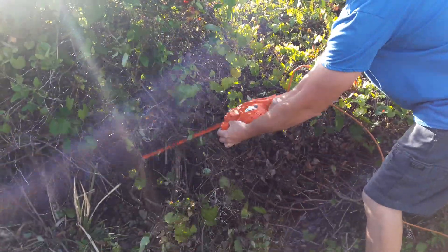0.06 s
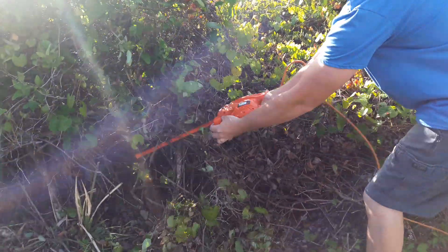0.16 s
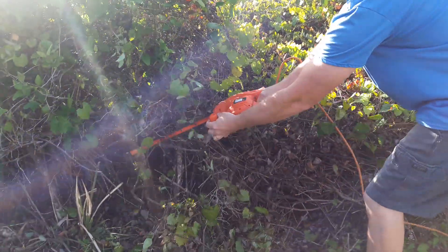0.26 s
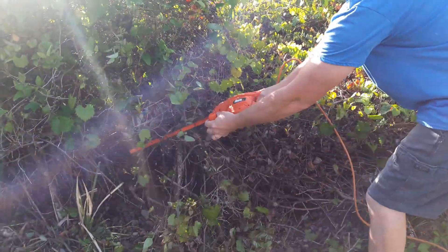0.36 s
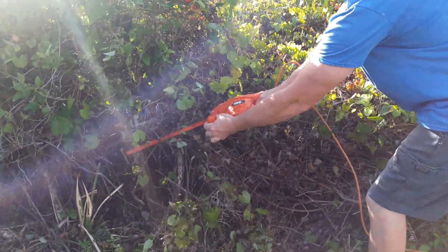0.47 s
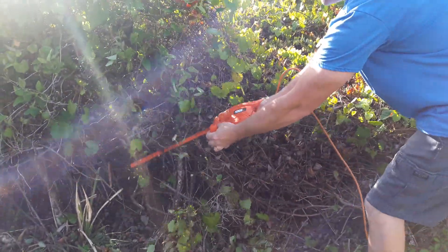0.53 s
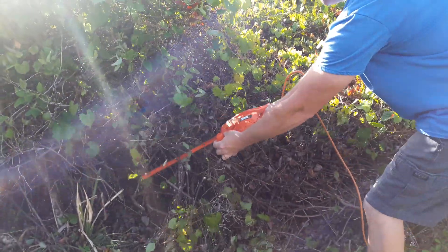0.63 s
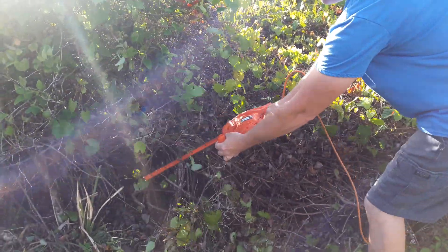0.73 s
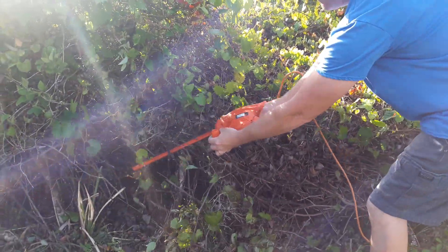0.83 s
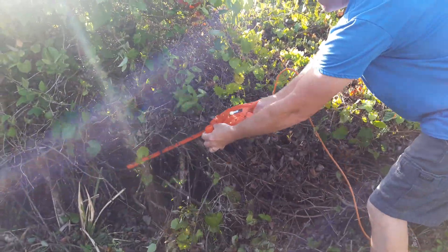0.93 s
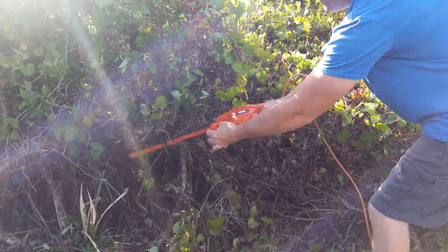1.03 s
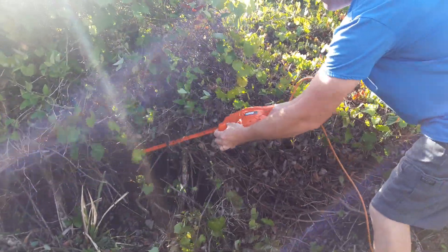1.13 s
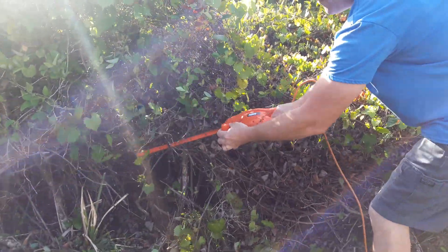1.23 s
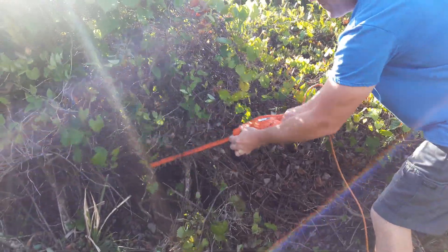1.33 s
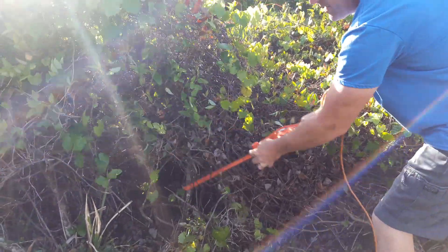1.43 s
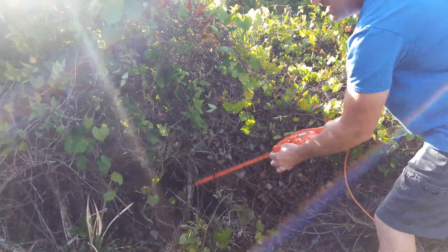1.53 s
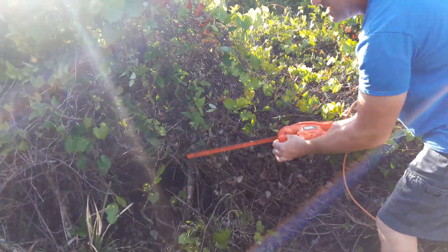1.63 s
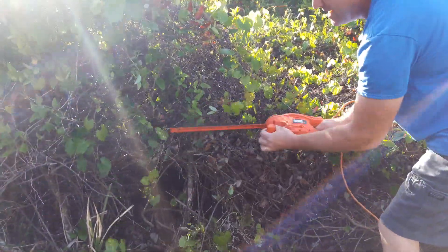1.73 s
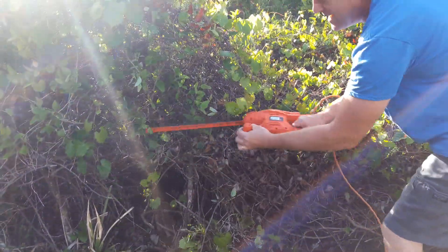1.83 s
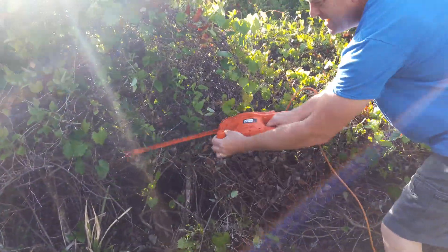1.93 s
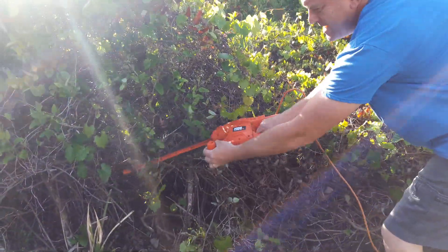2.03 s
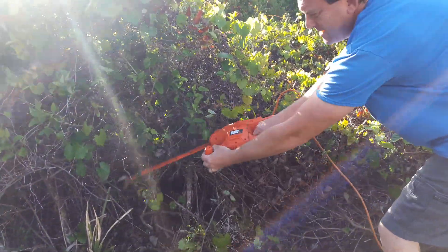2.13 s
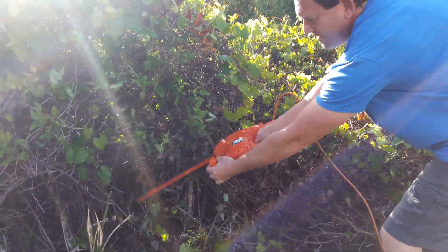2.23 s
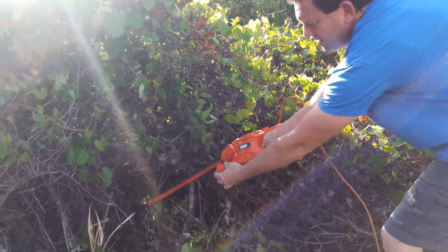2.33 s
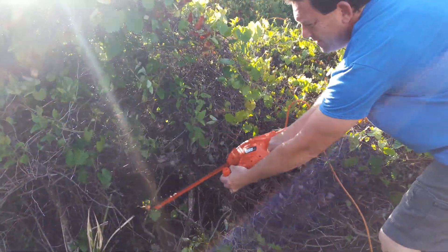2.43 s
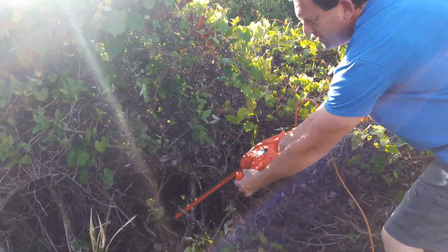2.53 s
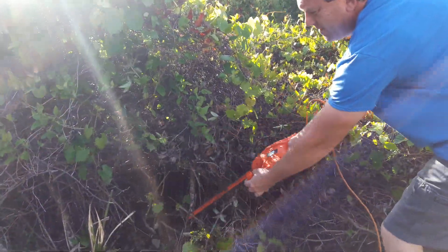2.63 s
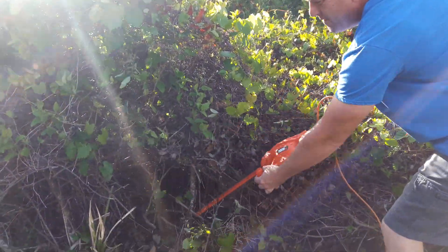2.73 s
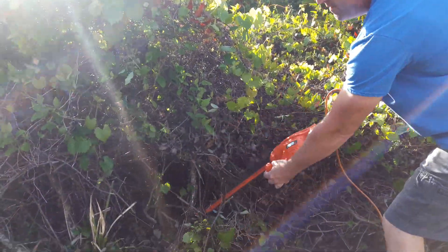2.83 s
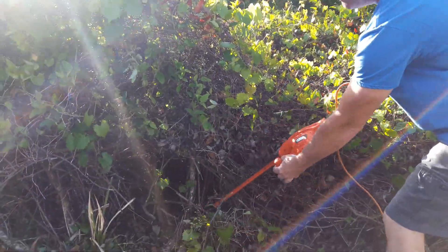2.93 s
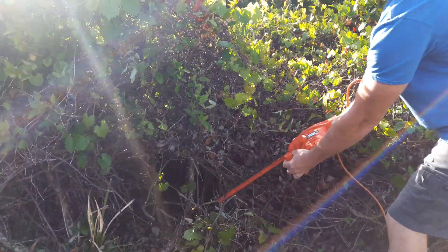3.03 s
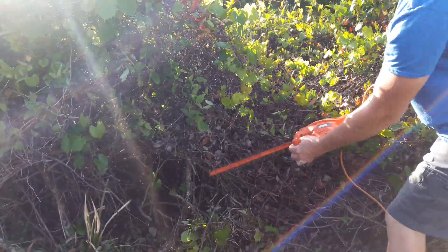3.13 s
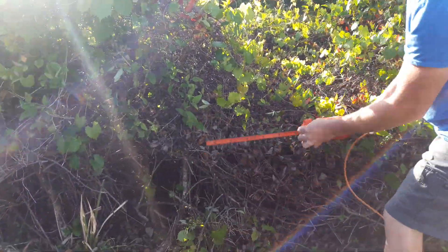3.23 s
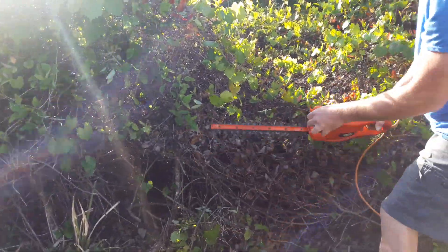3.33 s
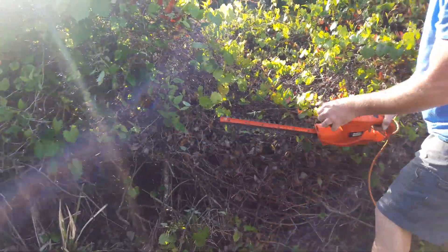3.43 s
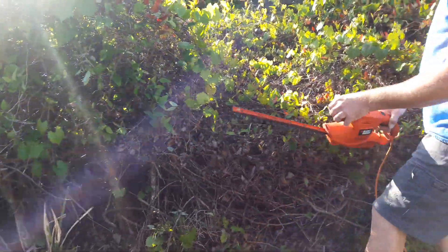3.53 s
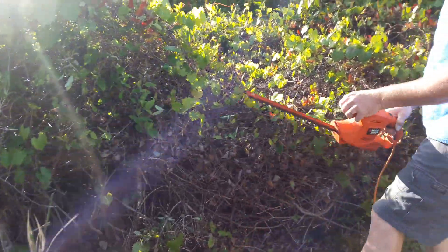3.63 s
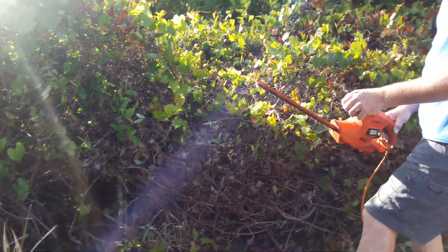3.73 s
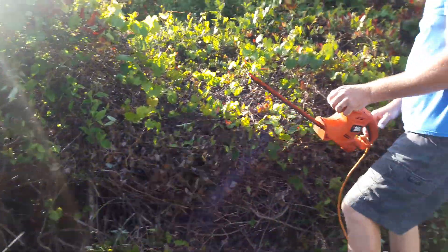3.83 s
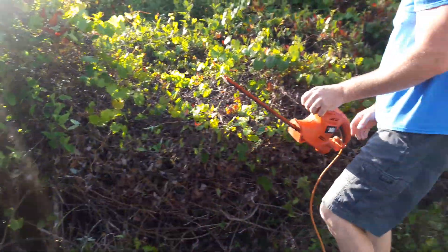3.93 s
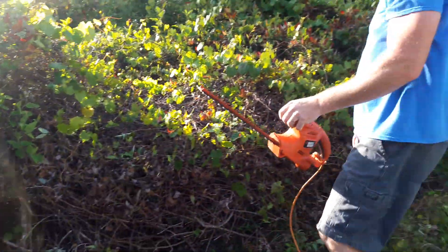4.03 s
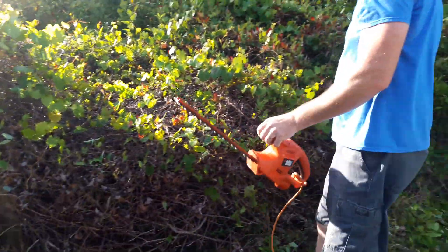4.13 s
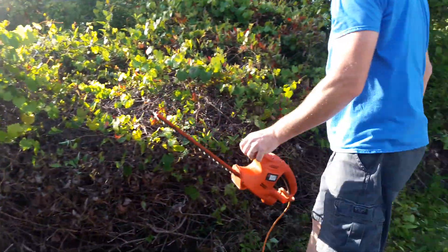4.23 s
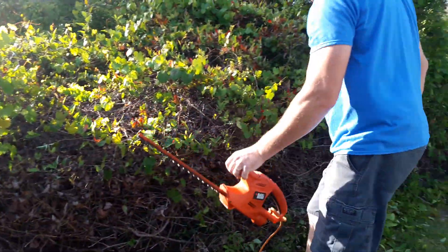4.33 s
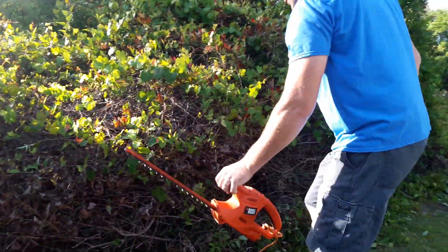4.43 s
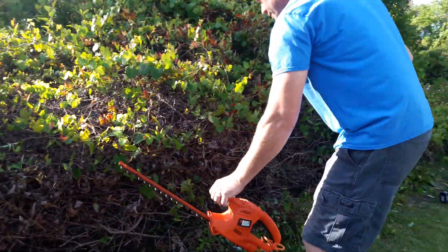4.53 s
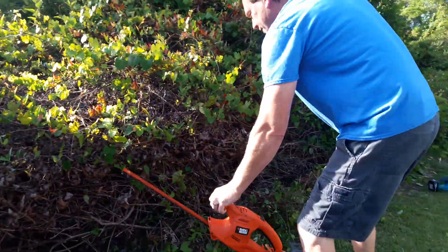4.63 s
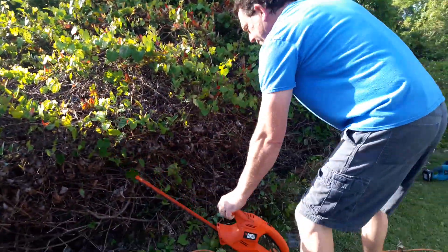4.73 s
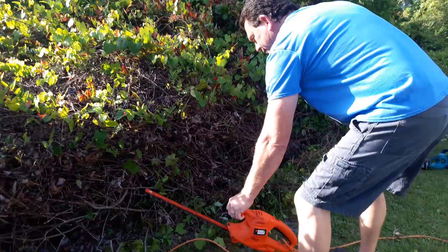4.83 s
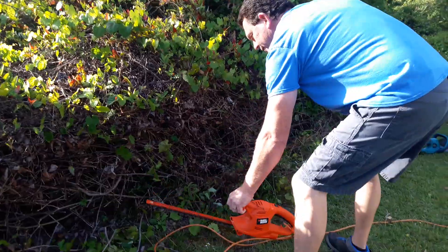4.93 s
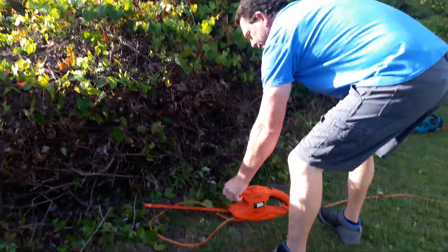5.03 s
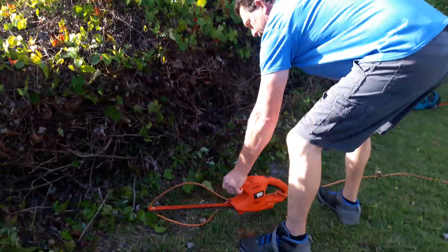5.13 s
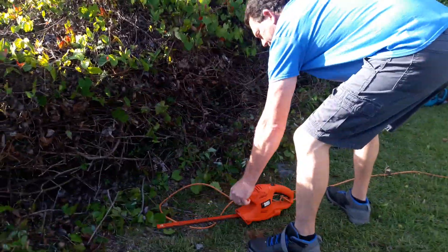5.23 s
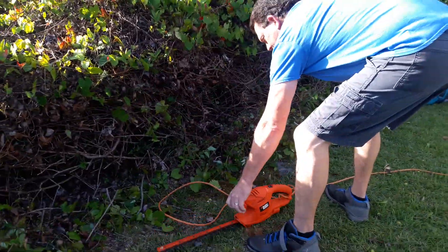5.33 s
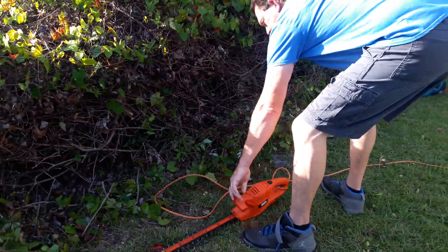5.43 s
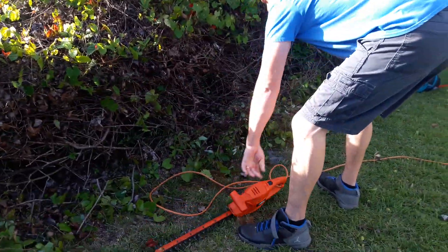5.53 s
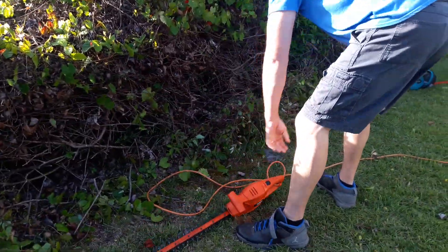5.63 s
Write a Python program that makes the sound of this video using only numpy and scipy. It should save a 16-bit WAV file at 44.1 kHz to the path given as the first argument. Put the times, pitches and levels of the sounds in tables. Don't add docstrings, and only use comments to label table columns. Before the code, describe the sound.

Harsh motor whirr and rapid blade chatter cut twigs outdoors, then the pitch slides down with loose knocks into quiet, windy garden air.

```python
import sys
import numpy as np
from scipy import signal
from scipy.fft import rfft, irfft, next_fast_len
from scipy.io import wavfile
from scipy.ndimage import uniform_filter1d, map_coordinates

SR = 44100
rng = np.random.default_rng(int(sys.argv[2]) if len(sys.argv) > 2 else 0)


def store_pcm(level_fs):
    pcm = np.round(np.clip(level_fs, -1, 1) * 32767).astype(np.int16)
    wavfile.write(sys.argv[1], SR, np.atleast_2d(pcm).T)


def how_loud(loudness_db):
    steps = np.asarray(loudness_db, float) / 20
    return 10 ** steps


N = 250482
T = np.arange(N) / SR

OFF_S, STOP_S = 3.2, 5.3742
RUB_HZ_PER_S, DRAG_HZ, DRAG_S = 531.9, 72.18, .7678
FULL_HZ = 2400
PINION, GEAR, FIRST_END = 6, 79, .27
TOOTH_DB, COAST_DB, COAST_DB_PER_HALVING = -38, -40, 4
BLADE_HZ = 2480
NIP_DB, NIP_SPREAD_DB, NIP_SNAP_DB = 4.5, 2, -11.5
KNOCK_SNAP_DB, TICK_SNAP_DB = -19, -24
GARDEN_DB, RUSTLE_DB, CALM_DB, HISS_DB = -56, -64.5, -64, -76

# time in seconds, tooth mesh in Hz, whine in dB.
MOTOR_LOAD = [(0, 2330, -46), (.3, 2262, -38), (.47, 2200, -36), (.7, 2375, -35), (.85, 2435, -57),
              (1.4, 2482, -42), (1.55, 2490, -48), (1.68, 2440, -41), (2.13, 2480, -41), (2.3, 2390, -38),
              (2.43, 2337, -30), (2.6, 2400, -37), (2.78, 2415, -38), (2.9, 2215, -31), (3.05, 2265, -35),
              (3.2, 2312, -35)]
# time in seconds, loudness in dB, turn toward the ports in dB, brush in dB.
SWEEP = [(0, -19.5, -1, 0), (.25, -21, 0.5, 2.5), (.45, -21.5, 0, 0.5), (.8, -22, 0, -1),
         (1.05, -21, 1.5, -1), (1.33, -20.5, 3, -2), (1.47, -22.5, -1.5, -1), (1.65, -21.5, 0, 1),
         (1.9, -21.5, -0.5, -0.5), (2.15, -20.5, .5, 1), (2.42, -20.5, 0, 1), (2.6, -22, 2, -1),
         (2.85, -21, -1, 0.5), (3.2, -23.5, 1, 1), (3.35, -29.5, -0.5, 0.5), (3.65, -26, 1.5, -1.5),
         (4.6, -38, -1.5, -2.5), (5.3, -48, -0.5, -1.5)]
PART_HZ = [900, 2400, 5000, 11000]
# level in dB in the brush, lifted and lowered, dB a halving of speed,
# share of the turn, share of the clack.
PARTS = [
    (-7.5, -8.5, -9, .5, -.3, 0.67),
    (-6.5, -8, -15, 1.1, .6, 1.36),
    (-3, -1.5, -3.5, -0.66, .8, 0.54),
    (-8.5, -8.5, -6.5, -3, -.3, .7),
]
BRUSH_SHARE = [-0.33, -.2, 0.0082, 1]
# frequency in Hz, density in dB per Hz.
VALLEY_TONE = [(100, -32), (300, -8.5), (1000, -12), (1800, 4), (2800, -6.5), (5000, -1.5), (7400, 1.5),
               (8200, -4), (12000, 1.5), (15800, -5)]
# frequency in Hz, width in Hz, level in dB.
MODES_IN_BRUSH = [(558, 238, -8.5), (1181, 580, -3), (2300, 390, 1), (2522, 214, 3), (3313, 650, -4),
                  (4577, 380, -3), (5610, 1100, -8.5), (6760, 950, -4.5), (9050, 620, -7),
                  (11220, 1400, -8.5)]
# frequency in Hz, width in Hz, level in dB.
MODES_RAISED = [(408, 430, -10.5), (1090, 280, -1.5), (2237, 330, 4.5), (2480, 210, 10.5), (3330, 1030, -3),
                (4640, 120, -1.5), (6000, 170, 1), (6720, 590, 0.5), (8700, 1100, -9.5), (12000, 1200, -19)]
# frequency in Hz, width in Hz, level in dB.
MODES_LOWERED = [(500, 240, -6), (1250, 360, 1), (2670, 700, 2), (4130, 480, -1), (4830, 400, -6),
                 (6124, 1300, -16), (10800, 2000, -17)]
# multiple of the mesh frequency, level in dB.
MESH_LINES = [(1, -3), (2, 5), (3, -5), (4, -4), (5, -2), (6, -4), (7, -2), (8, -6), (9, 0), (10, -4),
              (11, -9), (12, -5), (13, -6), (14, -10), (16, -9)]
# frequency in Hz, gain in dB.
MESH_RADIATION = [(300, -14), (750, -5), (1250, 2), (1700, -8), (2200, 1), (2900, -1), (3400, 2),
                  (3700, -5), (4200, 5), (4900, 0), (5800, 8), (6300, 2), (7000, 11), (8200, -7)]
# multiple of the shaft rate, level in dB.
SHAFT_LINES = [(1, -47.5), (2, -46.5)]
# time in seconds, blade ring in dB, ring in Hz, twig snap in dB.
BITES = [(0.0398, -2, 2290, -15), (0.1111, -25, 2300, -18), (0.163, -7, 5680, -18.5),
         (0.1955, -21, 2300, -8), (0.2488, -13, 2200, -20), (0.3184, -12.5, 4370, -28),
         (0.3531, -5.5, 2210, -12.5), (0.3885, -11, 2360, -26), (0.4244, -14.5, 6800, -26),
         (0.462, -13.5, 5440, -24), (0.5147, -15.5, 5400, -17), (0.5506, -16, 2340, -13.5),
         (1.185, -13, 2360, -12), (1.3654, -7.5, 2370, -29), (1.568, -21, 2600, -12.5),
         (1.603, -14, 2430, -11), (1.6688, -19, 2450, -28), (1.7963, -17, 2430, -18.5),
         (1.8627, -10, 2370, -31), (2.0055, -2.5, 2510, -26), (2.1321, -9, 2550, -8),
         (2.1958, -2, 2590, -5), (2.2927, -4.5, 2580, -12), (2.3594, -8.5, 2300, -20),
         (2.4094, -0.5, 2350, -16.5), (2.6229, -9.5, 4660, -13.5), (2.725, -1.5, 2510, -14),
         (2.8226, 1.5, 2360, -13), (2.8939, -5, 4440, -25), (3.243, -4.5, 2390, -35)]
# time in seconds, peak in dB.
BLADE_KNOCKS = [(3.3576, -18), (3.6524, -15), (3.679, -10), (3.7362, -9.5), (3.8055, -15), (3.836, -10),
                (4.027, -14), (4.104, -12.5), (4.2315, -17), (4.3854, -24), (4.5376, -35), (4.0612, -19),
                (4.2004, -18), (4.752, -38)]
# frequency in Hz, density in dB per Hz.
TWIG_TONE = [(400, -50), (1500, -14), (5000, -7), (9000, -4), (11500, 1), (15500, -13)]
# time in seconds, peak in dB, frequency in Hz.
HANDLE_BUMPS = [
    (1.69, -30, 150),
    (2.101, -39, 198),
    (4.257, -28, 111),
    (4.268, -35, 300),
    (4.342, -30, 271),
    (4.343, -33, 517),
    (4.72, -34, 201.4),
    (5.424, -42, 150),
]
# time in seconds, peak in dB, frequency in Hz.
LEAF_TICKS = [(4.8574, -36, 2560), (5.0894, -31, 3014), (5.1094, -34, 2580), (5.1694, -40, 2880),
              (5.228, -40, 2580), (5.3403, -39, 4920), (5.489, -33.5, 2980), (5.4964, -41, 4300),
              (5.5094, -34, 2530), (5.5394, -43, 2480), (5.5694, -46, 4500)]
# time in seconds, peak in dB, rise in seconds, fall in seconds.
GRASS_SWELLS = [
    (5.33, -68, .03, 0.055),
    (5.5, -51.5, 0.029, 0.052),
]
# frequency in Hz, density in dB per Hz.
GARDEN_TONE = [(120, -40), (200, -11.5), (523, -6), (1080, -17), (1820, -19), (2500, -29.5), (3250, -62),
               (5500, -120)]
# frequency in Hz, density in dB per Hz.
RUSTLE_TONE = [(590, -39), (1000, -5.5), (1880, -21), (2310, -19), (2910, -16.5), (6890, -20.5),
               (15600, -36)]
# frequency in Hz, density in dB per Hz.
WIND_TONE = [(12, -51.5), (20, -26), (70, -6), (118, -3), (231, -14.5), (300, -16), (390, -51), (660, -120)]
# time in seconds, level in dB over calm, half width in seconds.
WIND_GUSTS = [(0, 7, 0.18), (.4, 8, 0.17), (1, 8, .1), (1.4, 3, 0.12), (1.8, 10.5, 0.29), (2.6, 6, 0.11),
              (3.2, 1.5, 0.09), (4.25, 13.5, 0.19), (4.95, 16.5, 0.25), (5.6, 11, 0.13)]
# frequency in Hz, left-right likeness from 0 to 1.
COHERENCE = [(200, .97), (400, .97), (600, .85), (1400, .9), (3000, .9), (5000, .6), (8000, .25),
             (15000, .2)]
# frequency in Hz, lead of the left in radians.
PORT_PHASE = [(0, 4), (400, -0.36), (700, 1.1), (1210, -0.7), (1720, -2), (2150, -7), (3190, -5),
              (4130, -5.5), (4650, -8), (7240, -2), (12000, -19), (15300, -16)]
# frequency in Hz, left over right in dB.
PORT_SHADING = [(60, 8), (110, 2), (200, 2), (380, 3.5), (700, 1), (1290, 0.5), (2380, -2), (4400, 3.5),
                (8120, 1), (15000, -1)]


def unit(x):
    return x / np.sqrt(np.mean(x ** 2) + 1e-20)


def along(points, hz):
    f, v = np.transpose(points)
    return np.interp(np.log(hz + 1), np.log(f + 1), v)


def curves(rows):
    s, *columns = np.transpose(rows)
    return [np.interp(T, s, column) for column in columns]


def wobble(rate):
    return map_coordinates(rng.standard_normal(int(N * rate / SR) + 4), [T * rate])


def filtered(x, response):
    m = next_fast_len(N + SR // 4)
    return irfft(rfft(x, m) * response(np.fft.rfftfreq(m, 1 / SR)), m)[..., :N]


def patchy(depth_db):
    z = signal.stft(rng.standard_normal((2, N)), nperseg=256)[2]
    field = uniform_filter1d(rng.standard_normal(z.shape[1:]), size=5, axis=0)
    field = uniform_filter1d(field, size=14, axis=1)
    return signal.istft(z * how_loud(depth_db * unit(field)), nperseg=256)[1][:, :N]


def coloured(spectrum, depth_db):
    return unit(filtered(patchy(depth_db), lambda hz: how_loud(along(spectrum, hz))))


def jolts(s, gain, fade):
    steps = np.bincount(np.round(s * SR).astype(int), gain, N)
    return signal.lfilter([1], [1, -np.exp(-1 / (fade * SR))], steps)


def struck(s, db, hz, t60, attack):
    t = np.arange(SR // 20) / SR
    envelope = how_loud(db[:, None] - 60 * t / t60) * (1 - np.exp(-t / attack))
    ring = envelope * np.sin(2 * np.pi * hz[:, None] * t)
    at = np.round(s * SR).astype(int)[:, None] + np.arange(len(t))
    return np.bincount(at.ravel(), ring.ravel(), N + SR)[:N]


def mesh_hz():
    left = np.clip(STOP_S - T, 0, None)
    coasting = RUB_HZ_PER_S * left + DRAG_HZ * np.expm1(left / DRAG_S)
    return np.where(T < OFF_S, curves(MOTOR_LOAD)[0], coasting)


def halvings(mesh):
    return np.log2(FULL_HZ / np.clip(mesh, 60, FULL_HZ))


def stroke_ends(mesh):
    turns = np.cumsum(mesh) / SR / GEAR - FIRST_END
    return np.flatnonzero(np.diff(np.floor(2 * turns)))


def reversals(mesh):
    at = stroke_ends(mesh)
    db = 2.1 * rng.standard_normal(len(at)) + 2.3 * (np.arange(len(at)) % 2) - 3.0
    return jolts(at / SR, how_loud(db), fade=0.0028)


def body(hz, modes, valley):
    power = (valley * how_loud(along(VALLEY_TONE, hz))) ** 2
    for centre, width, db in modes:
        damping = (hz * width) ** 2
        power = power + how_loud(2 * db) * (damping / ((centre ** 2 - hz ** 2) ** 2 + damping)) ** 2
    return np.sqrt(power) * hz ** 2 / (hz ** 2 + 250 ** 2)


def rush(mesh):
    loud_db, turn_db, brush_db = curves(SWEEP)
    clack = reversals(mesh)
    noise = patchy(depth_db=0.7) * how_loud(0.4 * wobble(18) + 1.08 * wobble(130))
    up, down = np.clip((T - 3.2) / 0.37, 0, 1), np.clip((T - 4.4) / 0.42, 0, 1)
    poses = (MODES_IN_BRUSH, 1 - up), (MODES_RAISED, up - down), (MODES_LOWERED, down)
    out = 0
    for k, (*pose_db, slowing_db, turn_share, clack_share) in enumerate(PARTS):
        db = loud_db + slowing_db * halvings(mesh) + turn_share * turn_db + BRUSH_SHARE[k] * brush_db
        source = noise * (1 + clack_share * clack)
        band = list(zip(PART_HZ, np.eye(len(PART_HZ))[k]))
        for (modes, weight), held_db in zip(poses, pose_db):
            sound = unit(filtered(source, lambda hz: along(band, hz) * body(hz, modes, valley=0.32)))
            out = out + np.sqrt(weight) * how_loud(db + held_db) * sound
    return out * np.clip((5.38 - T) / 0.25, 0, 1)


def driven_whine(mesh, teeth):
    second_db = curves(MOTOR_LOAD)[1]
    first_db = TOOTH_DB + 3 * wobble(8) - (FULL_HZ - mesh) / 40
    flutter = lambda: how_loud(2.3 * wobble(55))
    lines = how_loud(second_db + 6) * flutter() * np.sin(2 * teeth)
    lines = lines + how_loud(first_db) * flutter() * np.sin(teeth)
    s, bite_db = np.transpose(BITES)[:2]
    lines = lines * (1 + jolts(s, how_loud(bite_db + 15), fade=0.0077))
    for k, db in SHAFT_LINES:
        lines = lines + how_loud(db + 2.5 + 2 * wobble(20)) * np.sin(k * teeth / PINION)
    return lines


def free_whine(mesh, teeth):
    lines = 0
    for k, db in MESH_LINES:
        chatter_db = 3.5 * wobble(30) + 3.5 * wobble(80)
        level = how_loud(db + along(MESH_RADIATION, k * mesh) + chatter_db)
        lines = lines + level * np.sin(k * teeth) * (k * mesh < 9500)
    lines = lines * (1 + .5 * np.cos(teeth / PINION))
    return how_loud(COAST_DB - COAST_DB_PER_HALVING * halvings(mesh)) * lines


def whine(mesh):
    teeth = 2 * np.pi * np.cumsum(mesh * (1 + 0.00203 * wobble(60))) / SR
    power = np.clip((OFF_S + .06 - T) / .06, 0, 1)
    coasting = np.clip((T - OFF_S) / .35, 0, 1) ** 2 * np.clip((5.22 - T) / .1, 0, 1)
    return power * driven_whine(mesh, teeth) + coasting * free_whine(mesh, teeth)


def garden():
    rustle = how_loud(RUSTLE_DB)
    for s, db, rise, fall in GRASS_SWELLS:
        rustle = rustle + how_loud(db) * np.exp(-np.where(T < s, (s - T) / rise, (T - s) / fall))
    grains = how_loud(1.9 * wobble(250))
    hush = how_loud(GARDEN_DB) * coloured(GARDEN_TONE, depth_db=0.0)
    return hush + rustle * unit(grains * coloured(RUSTLE_TONE, depth_db=-3.0))


def wind():
    lumps = how_loud(1.9 * np.array([wobble(14), wobble(8.4)]))
    air_db = CALM_DB + sum(db * np.exp(-((T - s) / width) ** 2 / 2) for s, db, width in WIND_GUSTS)
    return how_loud(air_db + [[4.5], [-.6]]) * unit(lumps * coloured(WIND_TONE, depth_db=-0.3))


def contacts(mesh):
    at = stroke_ends(mesh)
    at = at[T[at] < OFF_S]
    luck = np.clip(rng.standard_normal((len(at), 3)), -2, 1.5)
    loud_db, _, brush_db = curves(SWEEP)
    nip_db = loud_db[at] + NIP_DB + NIP_SPREAD_DB * luck[:, 0]
    nip_hz = BLADE_HZ * (1 + 0.047 * luck[:, 1])
    snap_db = nip_db + NIP_SNAP_DB + 2.5 * brush_db[at] + 3 * luck[:, 2]
    nips = np.transpose([T[at], nip_db, nip_hz, snap_db])
    knocks = [(s, db, BLADE_HZ * 1.02, db + KNOCK_SNAP_DB) for s, db in BLADE_KNOCKS]
    ticks = [(s, db - 20, hz, db + TICK_SNAP_DB) for s, db, hz in LEAF_TICKS]
    return np.vstack([BITES, nips, knocks, ticks]).T


def cuts(mesh):
    s, db, hz, snap_db = contacts(mesh)
    ring = struck(s, db - 5.5, hz, t60=0.024, attack=0.0007)
    burst = jolts(s, how_loud(snap_db - 6), fade=0.0045) * patchy(depth_db=2.0)
    snaps = filtered(burst, lambda hz: how_loud(along(TWIG_TONE, hz) + 6))
    return snaps + [ring, 0 * ring]


def handling():
    s, db, hz = np.transpose(HANDLE_BUMPS)
    bumps = struck(s, db + 9, hz, t60=0.019, attack=0.0017)
    s, db, hz = np.transpose(LEAF_TICKS)
    return bumps + struck(s, db - 5.0, hz, t60=0.0067, attack=0.00023)


def ports(pair):
    angle = lambda hz: np.arccos(np.clip(along(COHERENCE, hz), -1, 1)) / 2
    mid, side = filtered(pair, lambda hz: np.array([np.cos(angle(hz)), np.sin(angle(hz))]))
    half = lambda hz: how_loud(along(PORT_SHADING, hz) / 2) * np.exp(.5j * along(PORT_PHASE, hz))
    return filtered(np.array([mid + side, mid - side]), lambda hz: np.array([half(hz), 1 / half(hz)]))


def scene():
    mesh = mesh_hz()
    tool = rush(mesh) + cuts(mesh)
    tool[0] += whine(mesh) + handling()
    shared, apart = garden()
    around = [how_loud(0.9) * (shared + .6 * apart), how_loud(-1.0) * (shared - 0.47 * apart)]
    return ports(tool) + around + wind()


def low_pass(x):
    return signal.sosfilt(signal.butter(12, 15730, fs=SR, output="sos"), x)


def record(dry):
    mix = dry + how_loud(HISS_DB) * rng.standard_normal(dry.shape)
    return low_pass(mix)


dry = scene()
out = record(dry)
store_pcm(out)
```